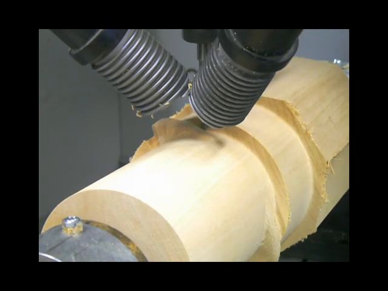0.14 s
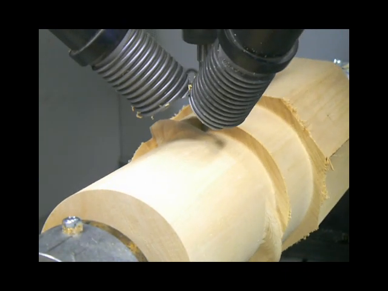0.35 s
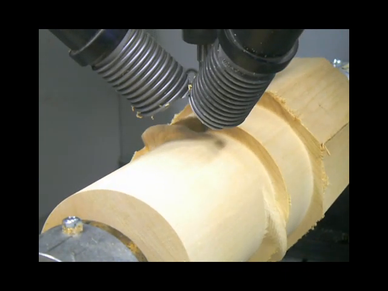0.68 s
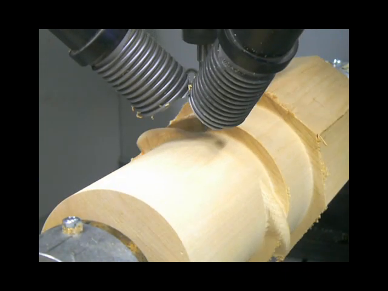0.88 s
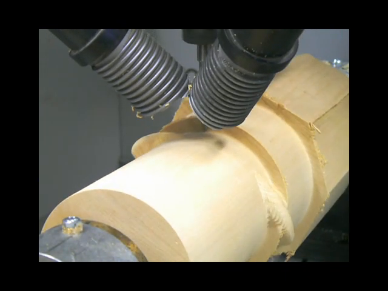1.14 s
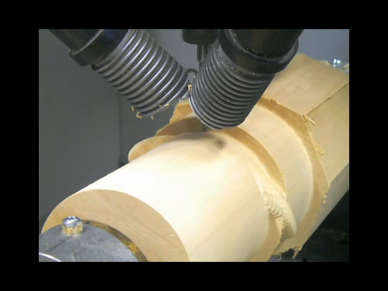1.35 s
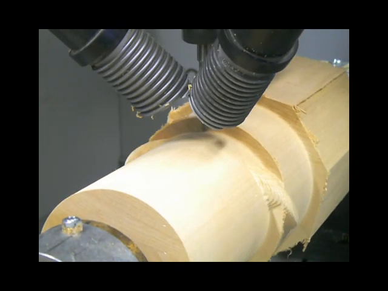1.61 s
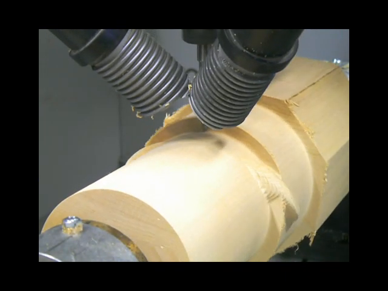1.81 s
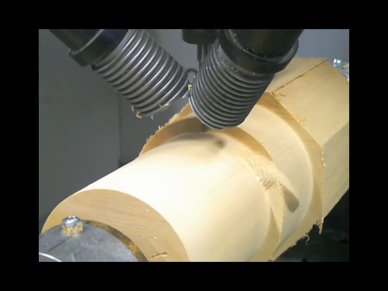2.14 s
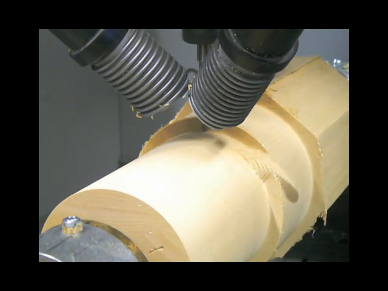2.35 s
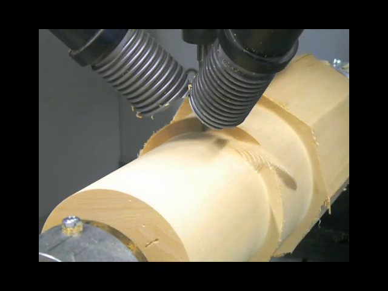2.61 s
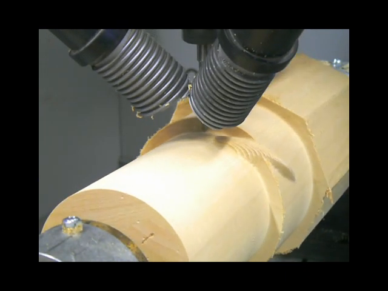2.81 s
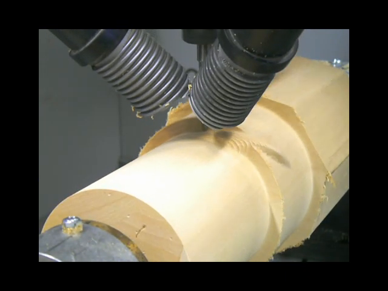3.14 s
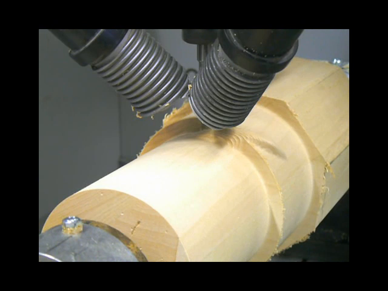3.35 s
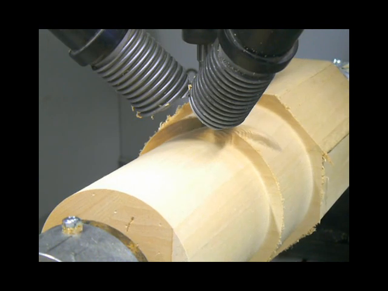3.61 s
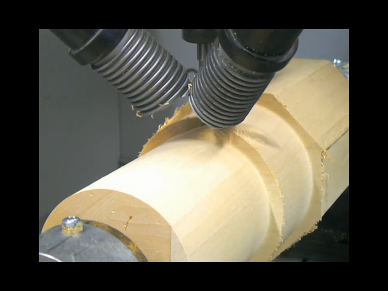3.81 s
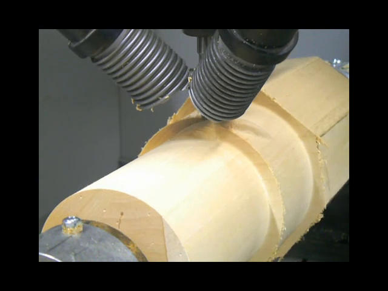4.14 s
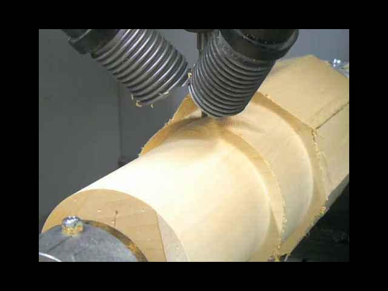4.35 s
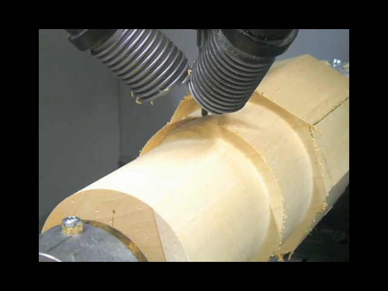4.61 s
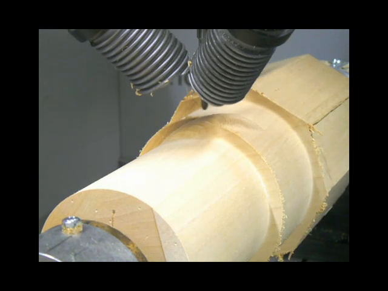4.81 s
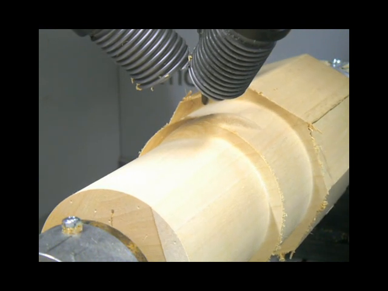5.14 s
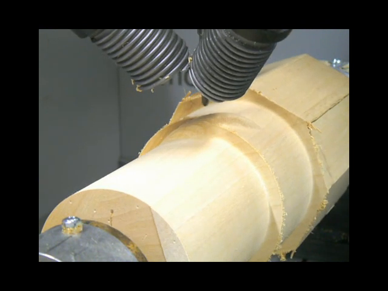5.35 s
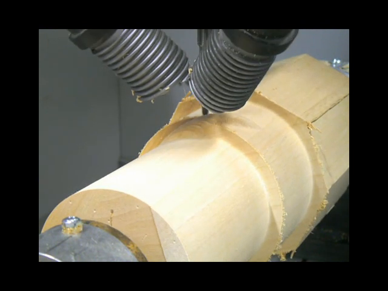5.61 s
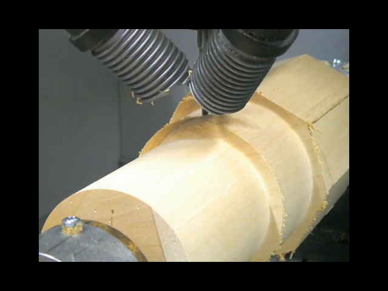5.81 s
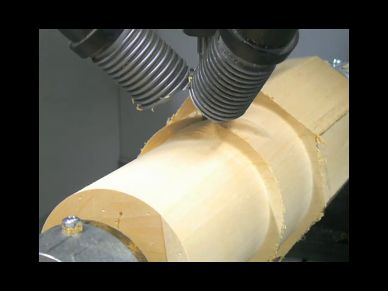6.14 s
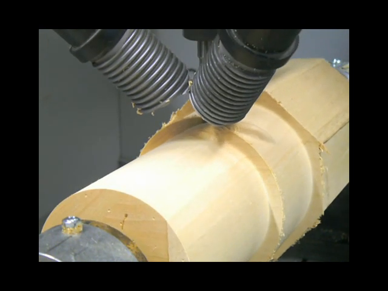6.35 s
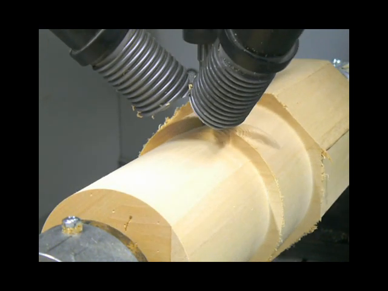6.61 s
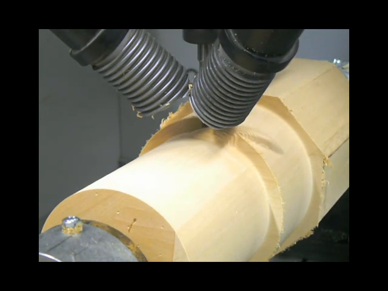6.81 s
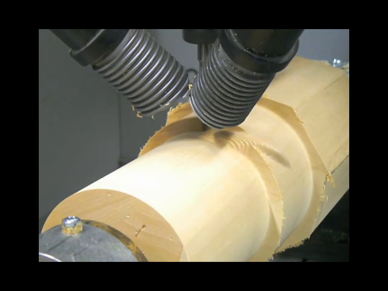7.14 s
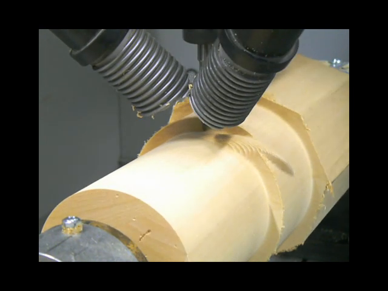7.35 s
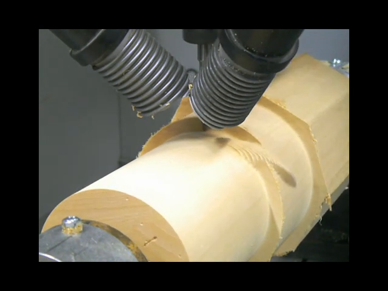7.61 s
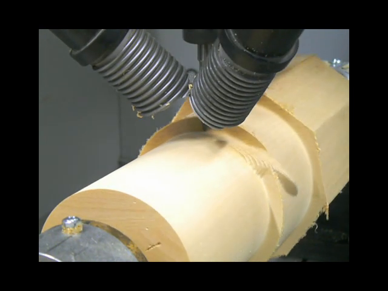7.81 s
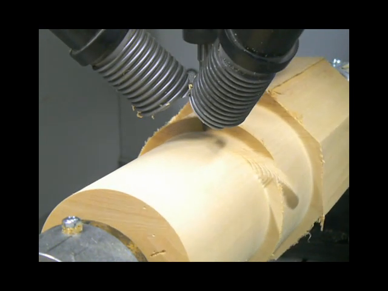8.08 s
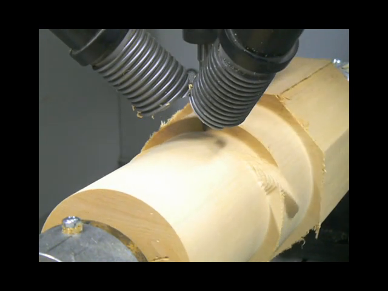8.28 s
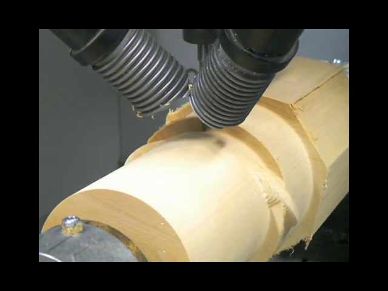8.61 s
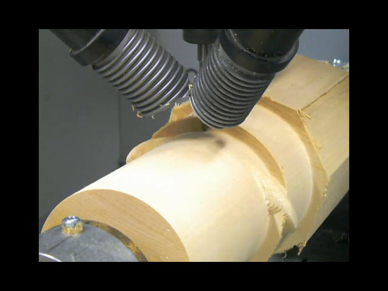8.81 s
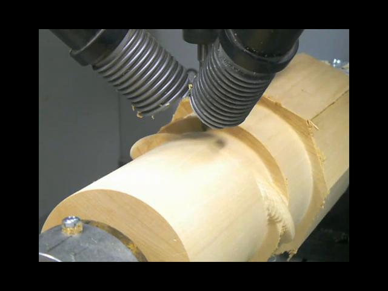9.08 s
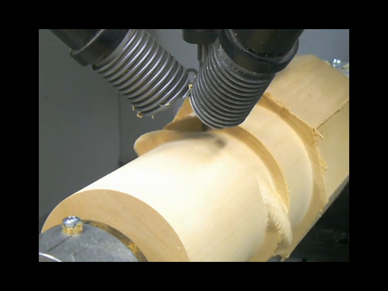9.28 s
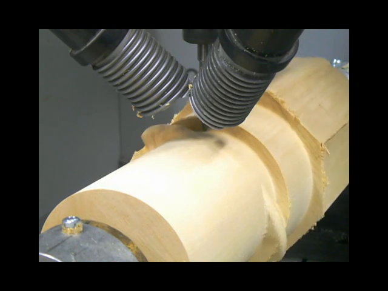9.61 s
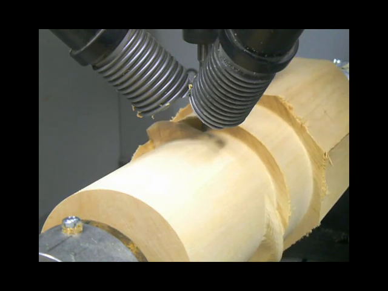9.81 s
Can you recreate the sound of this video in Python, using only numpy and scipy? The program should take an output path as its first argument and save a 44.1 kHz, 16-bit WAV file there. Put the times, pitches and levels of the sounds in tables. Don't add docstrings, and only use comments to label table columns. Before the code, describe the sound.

A machine is already running: a steady hum near 400 Hz, like a held motor note, mixed with a loud, hollow rush of air through dust hoses, strongest in the mids and coloured by fixed resonances. From 0 to 1 s the cutter's ringing, buzzing overtones grow sharper, then hold with small wavering as it mills wood. At about 3.7 s a short, thin squeal of chatter near 3 kHz appears, followed by two more around 4.0-4.3 s, sliding slightly down. The hum dips near 4.2 s and the cutting buzz fades by 4.7 s; the spindle runs free and the air surges gently around 4.9 s. From 5.8 to 6.5 s the cutter bites again, its buzz rebuilding, fuller by 7 s, and continuing to the end at about 10 s. A tiny click falls at 9 s. Narrow-band mono camera microphone, dull on top, with faint gritty digital artefacts.

```python
import sys
import numpy as np
from scipy import signal
from scipy.fft import rfft, irfft, dct, next_fast_len
from scipy.io import wavfile
from scipy.ndimage import uniform_filter1d, map_coordinates

SR = 44100
rng = np.random.default_rng(int(sys.argv[2]) if len(sys.argv) > 2 else 0)


def ratio(d):
    e = np.asarray(d, float) / 20
    return 10 ** e


def pcm_store(signal):
    levels = np.round(np.clip(np.atleast_2d(signal), -1, 1) * 32767)
    wavfile.write(sys.argv[1], SR, levels.astype(np.int16).T)


N = 438794

# (t/s, depth level/dB, tooth sharpness level/dB)
CUT = [(0.0, -3, -14), (0.4, -1, -6), (0.8, 0, -1), (2.0, 0, 0.5), (3.55, 0.5, 0.5), (4.2, -3, 2),
       (4.38, -4.5, -23.5), (4.52, -14, -22), (4.7, -33, -23), (5.8, -33, -16), (6.1, -10.5, -7.5),
       (6.45, -10, -1.5), (7.15, -3.5, -2.5), (7.85, -6, -1), (8.7, -5, -1), (9.95, -5, -0.5)]
# (order, column of CUT, level/dB)
RIDERS = [(2, 1, -14), (4, 2, -6), (5, 2, -13), (6, 2, -7), (8, 2, -7), (9, 2, -20), (10, 2, -35)]
# (centre t/s, length t/s, order, level/dB)
SWELLS = [(0.0, 0.57, 4, -30.5), (3.704, 0.15, 6, -42), (3.866, 0.25, 8, -35), (4.212, 0.42, 4, -31.5),
          (8.1, 4.6, 9, -49), (1.0, 4, 5, -44.5), (3.2, 2.2, 5, -34), (3.884, 0.46, 5, -41.5),
          (7.002, 1.2, 5, -41), (9.95, .8, 5, -44), (2.3, 6.3, 2, -44)]
# (t/s, half width t/s, level/dB)
UNLOAD = (4.2, 0.29, -5.5)
# (f/Hz, level/dB)
AIR_COLOUR = [(90, -85.5), (130, -32.5), (200, -20), (320, -6.5), (480, -21.5), (600, -12), (1000, -0.5),
              (1600, -4.0), (2100, -13.5), (2600, -6), (3250, -3.5), (3500, -20.5), (3750, -25.5),
              (3880, -25)]
# (f/Hz, width f/Hz, level/dB)
HOSE_MODES = [(86, 63, 14.0), (419, 105, 6.7), (613, 75, 11.5), (643, 28, -5.6), (720, 24, 5.8),
              (766, 40, -7.5), (877, 19, -3.4), (1053, 44, -10.3), (1167, 34, -5.5), (1256, 31, 4.7),
              (1353, 87, -9.4), (1520, 99, 10.9), (1533, 64, -13.9), (1790, 75, 5.5), (1936, 25, -3.2),
              (2025, 119, 5.8), (2169, 18, -3.2), (2324, 250, 8.6), (2464, 35, -3.9), (2542, 24, -2.1),
              (2835, 227, -4.0), (2867, 45, 4.2), (3003, 36, -5.4), (3247, 36, -6.1), (3335, 19, -2.5),
              (3483, 29, 4.1), (3556, 100, 5.2), (3871, 56, -10.7)]
# (f/Hz, width f/Hz, level/dB)
WHISTLES = [(616, 12, 3.5), (719, 16, 2), (984, 16, 3), (1254, 16, 1.5)]
# (t/s, lift 0-1)
HEAD_LIFT = [
    (4.2, 0),
    (4.6, 1),
    (5.9, 1),
    (6.4, 0),
]
# (f/Hz, width f/Hz, level/dB)
FREE_AIR = [
    (2304, 250, 2),
    (3030, 700, -1.5),
]
# (t/s, half width t/s, level/dB)
SURGE = (4.9, .15, 1)
# (start t/s, length t/s, level/dB, lower sidebands level/dB, upper sidebands level/dB)
CHATTER = [
    (3.72, .12, -32, 1, -10),
    (4.0, .07, -32.5, -4, 0),
    (4.13, .2, -32.5, -4, 0),
]
# (offset/turns, level/dB)
SIDEBANDS = [(-5, -10), (-4, -7), (-3, -1), (-2, -9), (-1, -6), (0, 0), (1, -7)]
# (t/s, level/dB)
SLIP = (8.9819, -15)
BAND_EDGES = [0, 100, 200, 300, 400, 510, 630, 770, 920, 1080, 1270, 1480, 1720, 2000, 2320, 2700, 3150,
              3700, 4400, 5300, 6400, 7700, 9500, 12000, 12500]
# (f/Hz, level/dB)
ROUNDING_STEPS = [(1, -35), (100, -29.5), (300, -20.4), (400, -14.6), (630, -19.6), (920, -20.1),
                  (1270, -16.7), (2700, -20.3), (3700, -28.2), (4400, -31.6), (6400, -35.6), (7700, -38.3),
                  (9500, -40.4), (12000, -38.2)]

FREE_HZ, SAG_HZ, SAG_LAW, SAG_S = 400.02, 0.8, 0.2, 0.4
DEPTH_DB, SHARP_DB = -25.5, -35
HUM_DB, HUM_LOAD_DB = -25.5, 1.16
RUSH_DB = -21.5
CHOKE_DB, CHOKE_LAW = -2, 1.5
CHATTER_HZ, SLIDE_FROM_S, SLIDE_HZ_PER_S = 3110, 3.82, 100
CHATTER_RISE_S, CHATTER_FALL_S = 0.05, 0.055
HELD_HZ = 48000.009
FRAME, FIRST = 2048, 1402


def curve(rows, column):
    rows = np.asarray(rows)
    return np.interp(np.arange(N) / SR, rows[:, 0], rows[:, column])


def evened(x):
    return x / np.sqrt(np.mean(x ** 2))


def drift(top_hz):
    size = next_fast_len(N)
    spectrum = rfft(rng.standard_normal(size))
    rolloff = 1 + (np.fft.rfftfreq(size, 1 / SR) / top_hz) ** 4
    return evened(irfft(spectrum / rolloff, size)[:N])


def tone(angle, db, waver_db, lag=0):
    level = np.sqrt(2) * ratio(db + waver_db * drift(12))
    return level * np.cos(angle + lag + 0.06 * waver_db * drift(3))


def passing_db(event):
    centre_s, half_width_s, db = event
    return db * np.exp(-((np.arange(N) / SR - centre_s) / half_width_s) ** 2)


def modes_db(hz, modes):
    return sum(db / (1 + (2 * (hz - centre) / width) ** 2) for centre, width, db in modes)


def load():
    return ratio(curve(CUT, 1))


def choke_db():
    return CHOKE_DB * (load() ** CHOKE_LAW - 0.5) + passing_db(SURGE)


def speed():
    biting = np.minimum(ratio(curve(CUT, 2)), 1) * load() ** SAG_LAW
    return FREE_HZ - SAG_HZ * uniform_filter1d(biting, size=round(SAG_S * SR), mode="nearest")


def spindle(turn):
    t = np.arange(N) / SR
    lag = np.pi / 2 * np.arange(11) ** 2
    hum_db = HUM_DB + HUM_LOAD_DB * load() + passing_db(UNLOAD)
    out = tone(turn, hum_db, 0.6, lag[1])
    level = [None, DEPTH_DB + curve(CUT, 1), SHARP_DB + curve(CUT, 2)]
    out = out + tone(3 * turn, level[1], 0.4, lag[3])
    out = out + tone(7 * turn, level[2], 1.0, lag[7])
    for order, column, db in RIDERS:
        k = round(order)
        out = out + tone(k * turn, level[round(column)] + db, 1.1, lag[k])
    for centre_s, length_s, order, db in SWELLS:
        k = round(order)
        swell = np.cos(np.pi * np.clip((t - centre_s) / length_s, -0.5, 0.5))
        out = out + swell * tone(k * turn, db, 1.4, lag[k])
    return out


def extraction():
    size, hop = 4096, 1024
    frames = N // hop + 5
    hz = np.fft.rfftfreq(size, 1 / SR)
    real, imaginary, patches = rng.standard_normal((frames, len(hz), 3)).T
    patches = uniform_filter1d(patches, size=30, axis=0)
    patches = evened(uniform_filter1d(patches, size=6, axis=1))
    f, level = np.transpose(AIR_COLOUR)
    colour_db = np.interp(np.log(hz + 1), np.log(f + 1), level)
    colour_db = colour_db + modes_db(hz, HOSE_MODES) + modes_db(hz, WHISTLES)
    colour_db = np.maximum(colour_db, np.where(hz < 100, -51, -140))
    colour_db = np.where(hz < 3900, colour_db, -140)
    lift = np.interp(np.arange(frames) * hop / SR, *np.transpose(HEAD_LIFT))
    lift_db = modes_db(hz, FREE_AIR)[:, None] * lift
    spectrum = (real + 1j * imaginary) * ratio(colour_db[:, None] + lift_db + 0.8 * patches)
    air = evened(signal.istft(spectrum, nperseg=size, noverlap=size - hop)[1][:N])
    return ratio(RUSH_DB + choke_db() + 0.2 * drift(30)) * air


def chatter(turn):
    t = np.arange(N) / SR
    squeal_hz = CHATTER_HZ - SLIDE_HZ_PER_S * np.clip(t - SLIDE_FROM_S, 0, 1)
    angle = 2 * np.pi * np.cumsum(squeal_hz) / SR
    squeal = tone(angle, -0.54, 1.2)
    lower, upper = np.zeros(N), np.zeros(N)
    for offset, db in SIDEBANDS:
        if offset:
            side = lower if offset < 0 else upper
            side += tone(angle + round(offset) * turn, db - 0.5, 1.8)
    out = np.zeros(N)
    for start_s, length_s, db, lower_db, upper_db in CHATTER:
        corners_s = start_s + np.cumsum([-CHATTER_RISE_S, CHATTER_RISE_S, length_s, CHATTER_FALL_S])
        burst = np.interp(t, corners_s, [0, 1, 1, 0])
        out += burst * ratio(db) * (squeal + ratio(lower_db) * lower + ratio(upper_db) * upper)
    return out


def scene():
    turn = 2 * np.pi * np.cumsum(speed()) / SR
    return (spindle(turn) + extraction() + chatter(turn))[None]


def preamp(x):
    soft = x / (1 + (abs(x) / 0.42) ** 5) ** (1 / 5)
    band = signal.firwin(1023, 4040, window=("kaiser", 9), fs=SR)
    return signal.oaconvolve(soft, band, "same")


def rate_conversion(x):
    n = np.arange(N)
    late = 1.447 * ((n * HELD_HZ / SR) % 1 - 0.5) * SR / HELD_HZ
    x = map_coordinates(x, [n - late], order=3, mode="mirror")
    blur = 0.22
    x = np.convolve(x, [blur, 1 - 2 * blur, blur], "same")
    slip_s, slip_db = SLIP
    return x + ratio(slip_db) * (n == round(slip_s * SR))


def camera_rounding(x):
    m, half = FRAME, FRAME // 2
    lead = 2 * m - FIRST
    padded = np.pad(x, (lead, 3 * m))
    at = np.arange(len(padded) // m - 1)[:, None] * m + np.arange(2 * m)
    window = np.sin(np.pi * (np.arange(2 * m) + 0.5) / (2 * m))
    a, b, c, d = np.split(padded[at] * window, 4, axis=1)
    bins = dct(np.c_[-c[:, ::-1] - d, a - b[:, ::-1]], 4, norm="ortho")
    hz = (np.arange(m) + 0.5) * SR / (2 * m)
    lower_hz = np.array(BAND_EDGES)[np.searchsorted(BAND_EDGES, hz) - 1]
    t = (at[:, m] - lead) / SR
    budget_db = 0.7 * rng.standard_normal(len(t))
    budget_db = budget_db + 0.6 * np.interp(t * SR, np.arange(N), choke_db())
    budget_db = budget_db - 15 * (abs(t - SLIP[0]) < m / SR / 2)
    step = ratio(np.interp(lower_hz, *np.transpose(ROUNDING_STEPS)) + budget_db[:, None])
    rounded = np.round(bins / step) * step * (hz < BAND_EDGES[-1])
    u = dct(rounded, 4, norm="ortho")
    p, q = u[:, :half], u[:, half:]
    out = np.zeros(len(padded))
    np.add.at(out, at, np.c_[q, -q[:, ::-1], -p[:, ::-1], -p] * window)
    return out[lead:lead + N]


def low_pass(x):
    return signal.sosfilt(signal.butter(12, 12450, fs=SR, output="sos"), x)


def record(dry):
    x = preamp(dry[0])
    x = rate_conversion(x)
    mix = camera_rounding(x)[None]
    return low_pass(mix)


dry = scene()
out = record(dry)
pcm_store(out)
```